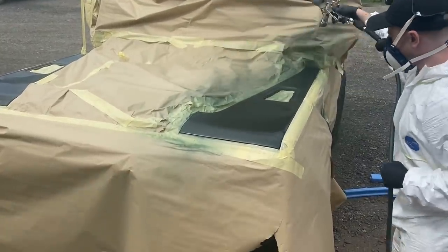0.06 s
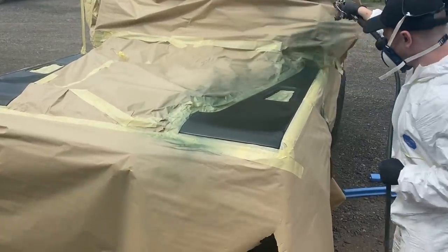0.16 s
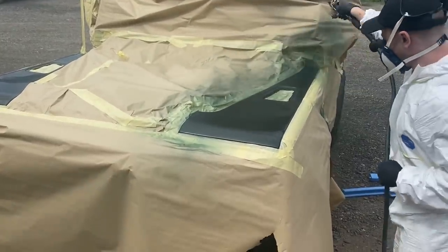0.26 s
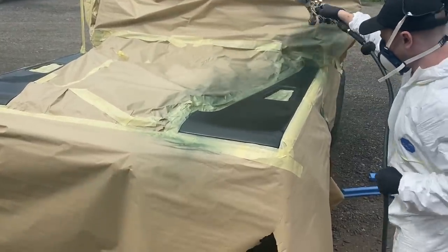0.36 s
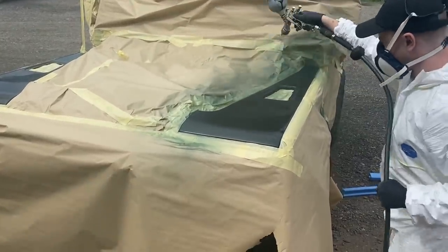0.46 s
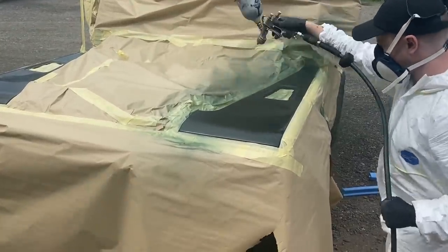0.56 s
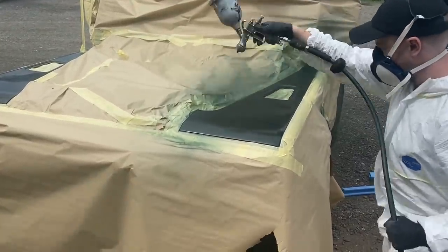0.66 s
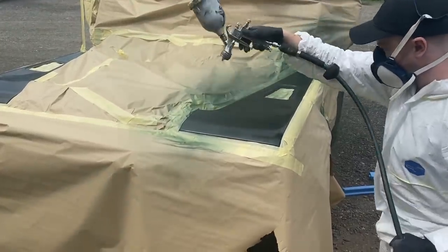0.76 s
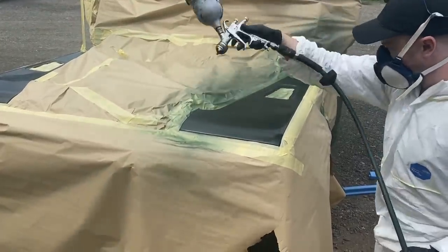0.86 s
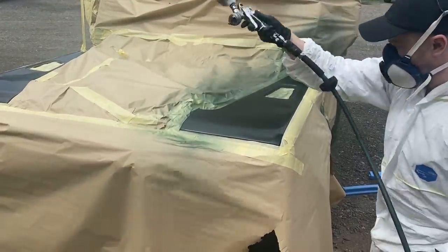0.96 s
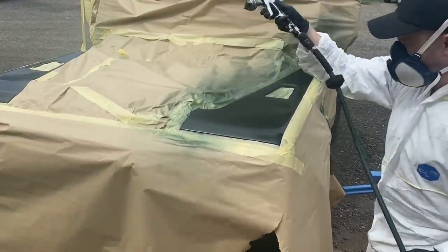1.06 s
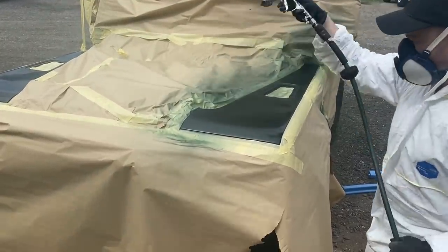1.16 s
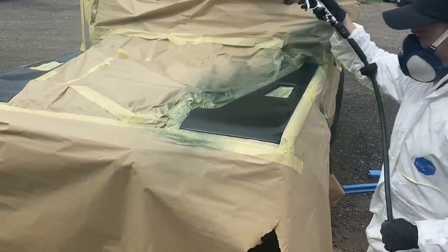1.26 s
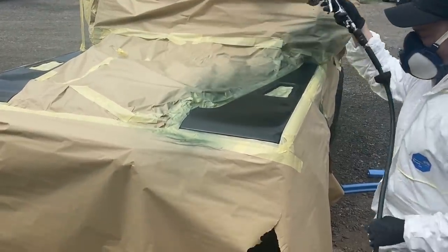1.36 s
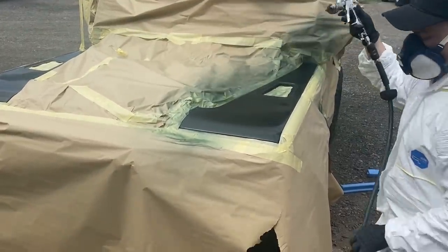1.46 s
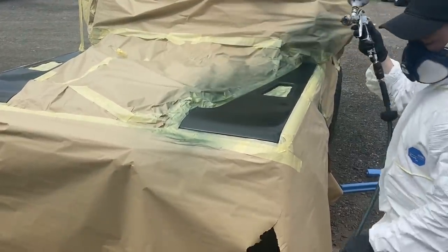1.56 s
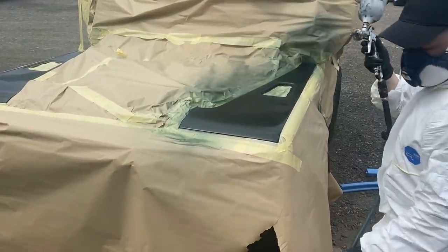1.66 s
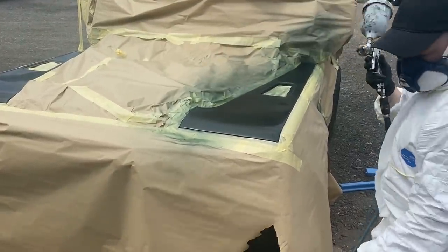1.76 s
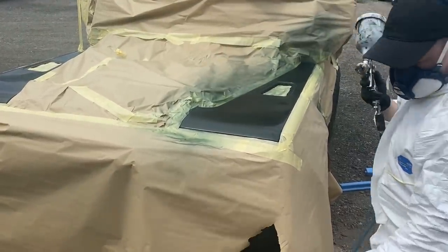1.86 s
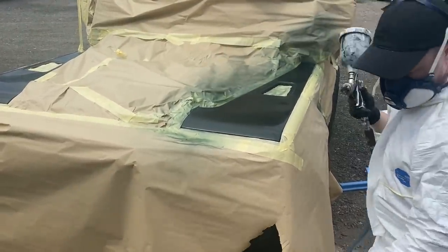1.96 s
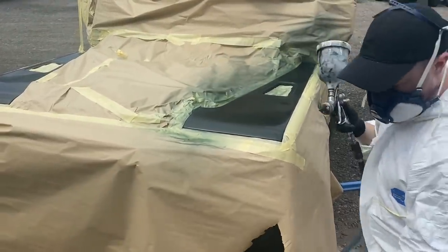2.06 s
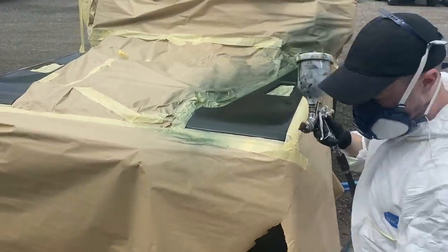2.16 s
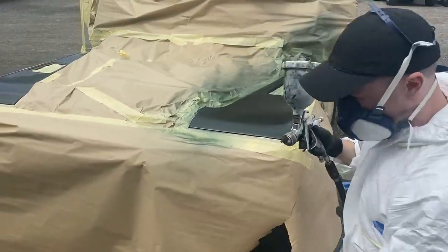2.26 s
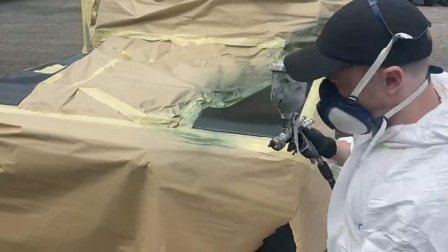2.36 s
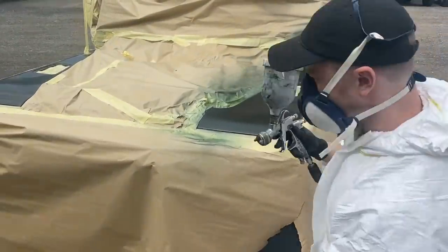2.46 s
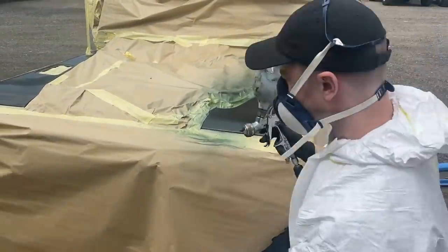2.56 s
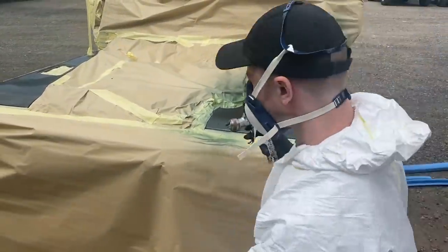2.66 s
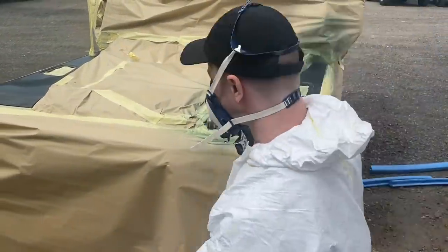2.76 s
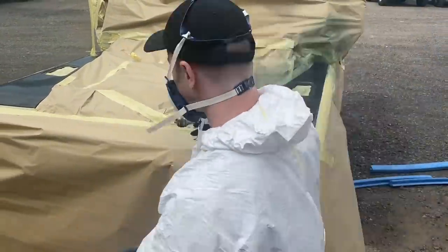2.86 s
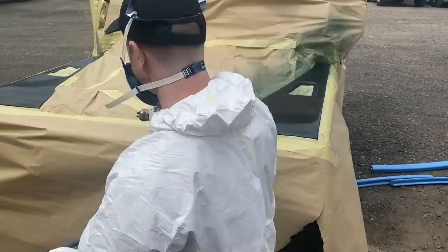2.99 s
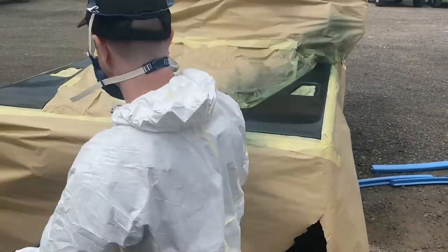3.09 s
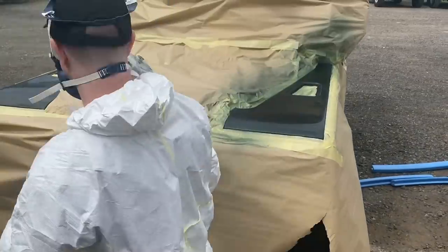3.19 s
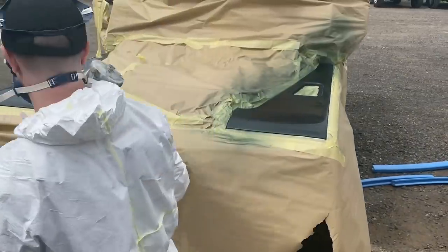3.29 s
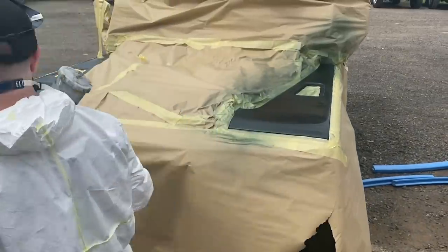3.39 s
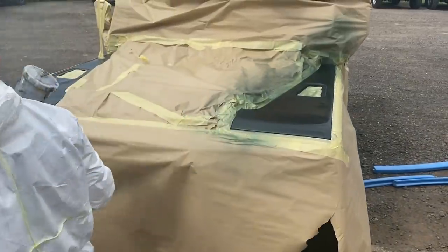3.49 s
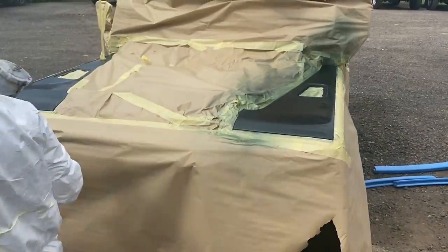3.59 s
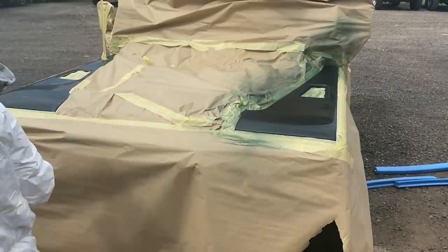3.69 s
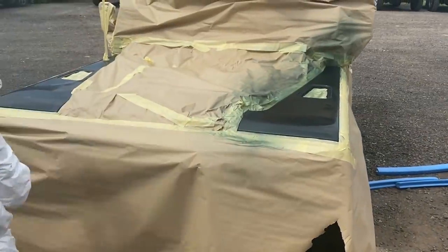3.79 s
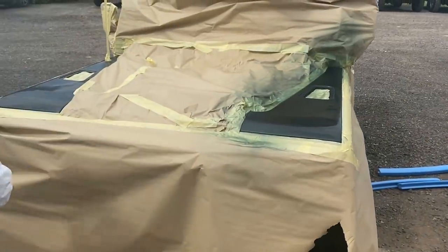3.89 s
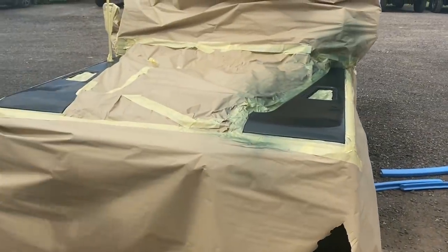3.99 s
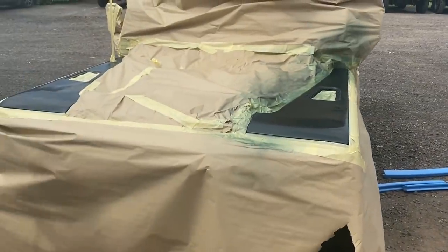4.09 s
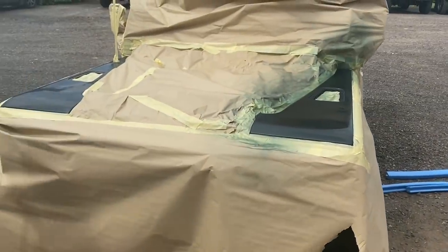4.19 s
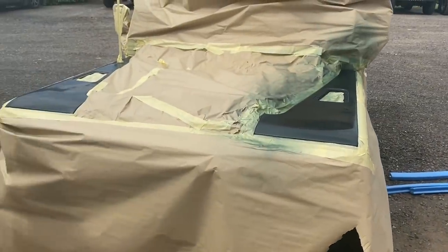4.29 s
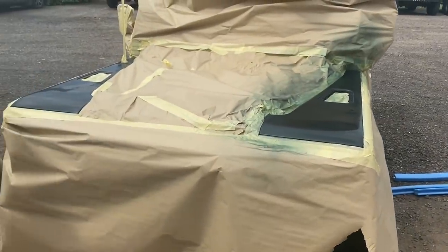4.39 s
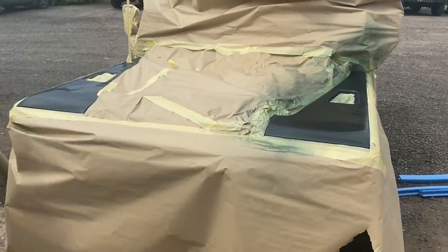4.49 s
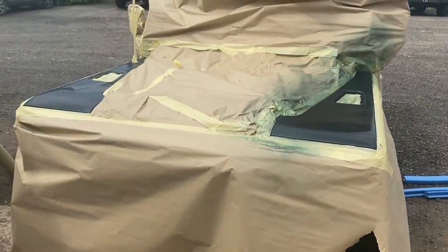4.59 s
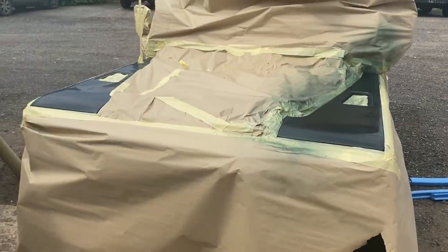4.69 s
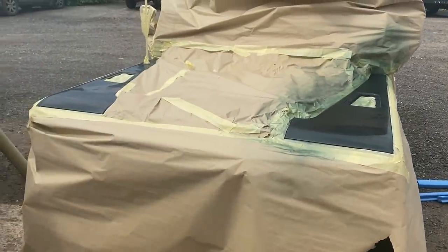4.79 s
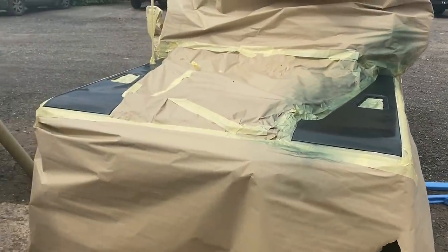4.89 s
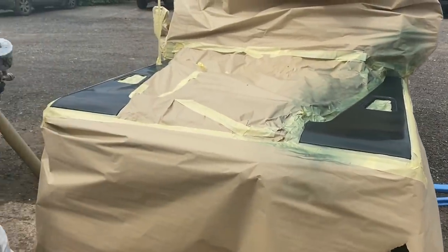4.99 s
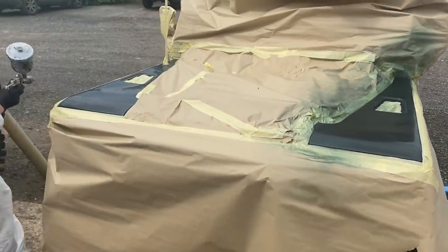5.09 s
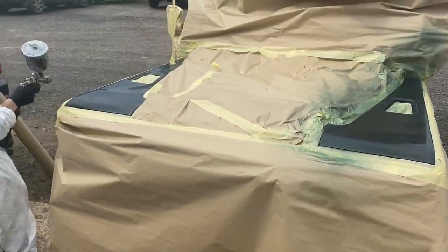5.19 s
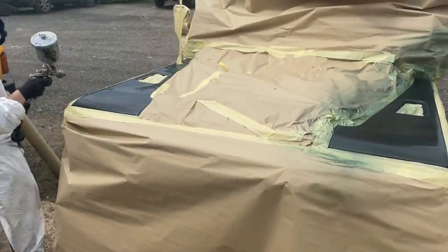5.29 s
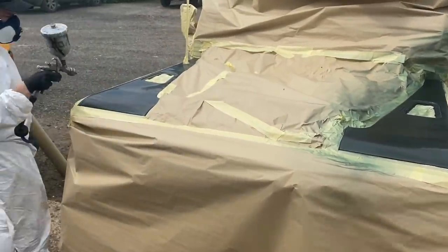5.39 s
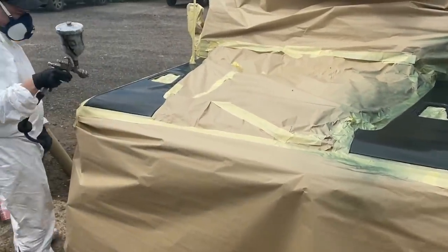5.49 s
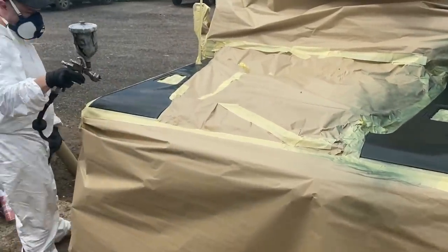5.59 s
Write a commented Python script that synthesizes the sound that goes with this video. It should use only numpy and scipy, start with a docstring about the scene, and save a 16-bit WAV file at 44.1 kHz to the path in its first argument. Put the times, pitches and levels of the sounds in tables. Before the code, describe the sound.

A spray gun hisses hard, drops to a faint air leak, then hisses again, with wind bumping the microphone outdoors.

```python
"""Outdoors, beside a paper-masked car, a painter works a spray gun. Its turbulent air jet hisses at full
strength, drops to a faint leak while the painter walks round, and opens again near the end. Echoes from
the panel, paper and ground colour the hiss. Air buffets the hand-held microphone, shoes and cloth scuff,
small things tick, and a distant motor hums over the low rush of the yard."""
import sys
import numpy as np
from scipy import signal
from scipy.fft import rfft, irfft, next_fast_len
from scipy.io import wavfile
from scipy.ndimage import uniform_filter1d, map_coordinates

SR = 44100
rng = np.random.default_rng(int(sys.argv[2]) if len(sys.argv) > 2 else 0)


def materialize(psi):
    """Save the field psi as 16-bit PCM at rate SR to the path in sys.argv[1].

    A 1-D psi becomes a single channel; in a 2-D psi each row is a channel.
    """
    bounded = np.clip(np.atleast_2d(psi).T, -1, 1)
    quanta = np.round(bounded * 32767).astype(np.int16)
    wavfile.write(sys.argv[1], SR, quanta)


N = 249165

# The distant motor. Each row: time in seconds, level in dB.
MOTOR_LEVEL = [(3.1, -100), (3.4, -73), (4.04, -73.5), (4.41, -83.5), (4.55, -69.5), (4.89, -79.5),
               (4.98, -62), (5.12, -82.5), (5.25, -74.5), (5.4, -100)]
# Shoes and cloth. Each row: middle in seconds, level in dB, length in seconds, band pitch in Hz.
SCUFFS = [(0.323, -50, 0.0665, 500.3), (1.25, -54.5, 0.06585, 1792), (1.351, -63.5, 0.0466, 1210),
          (1.535, -60, 0.0689, 1495), (2.205, -60, 0.076, 797), (3.396, -65, 0.082, 1502),
          (3.856, -61.5, 0.0394, 994.5), (4.314, -60.5, 0.0353, 902.4), (4.487, -57, 0.05038, 2610),
          (4.64, -64, 0.0448, 899), (5.075, -63.5, 0.03195, 1500)]
# Small knocks. Each row: start in seconds, ring level in dB, pitch in Hz, seconds to fall 60 dB,
# click level in dB relative to the ring.
KNOCKS = [(1.063, -34, 360.3, 0.01083, 2.5), (1.408, -49, 486, 0.01262, 6),
          (2.165, -48.5, 751.8, 0.01258, 11.5), (4.659, -51.5, 546, 0.01315, 5),
          (4.708, -43.5, 527.3, 0.0126, 4.5), (4.744, -58.5, 301, 0.01341, 11),
          (5.075, -52, 421.3, 0.01647, 5)]
# Air between gusts. Each row: time in seconds, thump level in dB, flutter level in dB.
BREEZE = [(0, -69.5, -62), (.9, -64.5, -62), (1.4, -78, -80), (2.3, -77, -71), (2.6, -83.5, -73),
          (3.2, -83.5, -72), (3.6, -83.5, -71.5), (4.25, -83.5, -67), (4.45, -76, -75.5), (5.2, -75.5, -71),
          (5.65, -75.5, -64.5)]
# Gusts. Each row: peak time in seconds, thump in dB, flutter in dB, seconds to fall 20 dB (sign unused).
GUSTS = [(.032, -62.5, -64, 0.0861), (.31, -69, -53.5, 0.0362), (.42, -59.5, -75.5, 0.1238),
         (.49, -46.5, -70, -0.0287), (.535, -38, -53.5, 0.024), (.578, -39, -59.5, 0.0508),
         (.67, -56, -61.5, 0.4412), (0.753, -33, -75, 0.0365), (.825, -51.5, -70, 0.318),
         (.965, -47, -37, 0.0631), (1.004, -34, -31, 0.0634), (1.025, -32, -41.5, 0.0563),
         (1.068, -40.5, -40.5, 0.0686), (1.19, -48.5, -55, 0.0978), (1.27, -44, -62.5, 0.0753),
         (1.315, -47.5, -67.5, 0.0644), (1.424, -48, -69, 0.1007), (1.562, -54, -65, 0.0007),
         (1.66, -63.5, -86, 0.3052), (1.845, -56.5, -78, 0.1655), (2.064, -51.5, -79.5, 0.0142),
         (2.165, -48, -68, 0.0688), (2.31, -49.5, -62, 0.0454), (2.37, -51, -71, 0.1046),
         (2.45, -68.5, -69.5, 0.2611), (2.53, -68, -70.5, -0.142), (2.66, -56.5, -65, 0.0214),
         (2.785, -57.5, -62.5, 0.0729), (2.91, -66.5, -71, 0.58), (3.02, -65, -84.5, 0.31),
         (3.12, -60.5, -77, 0.0434), (3.26, -64.5, -74, 0.0011), (3.385, -58, -67.5, 0.1342),
         (3.49, -62, -68, 0.013), (4.318, -53, -59, 0.0242), (4.352, -50.5, -70, 0.0482),
         (4.5, -70.5, -60.5, 0.1992), (4.59, -55.5, -70, 0.0467), (4.63, -48, -77, 0.0366),
         (4.661, -65.5, -65.5, -0.0391), (4.71, -60.5, -56, 0.0238), (4.755, -59.5, -72, 0.11),
         (4.95, -73, -67, 0.2532), (5.075, -72.5, -63.5, 0.1233), (5.63, -60.5, -66, 0.2535)]
# Spectra of wind and jet. Each row: frequency in Hz, relative spectral density in dB.
THUMP_SPECTRUM = [(20, -24), (35, -13), (55, 3.5), (90, -1.5), (140, -12.5), (220, -27), (400, -70.5)]
FLUTTER_SPECTRUM = [(100, -6.5), (190, -2), (330, -5.5), (600, -9.5), (1000, -14), (2000, -64.5)]
JET_SPECTRUM = [(50, -58), (150, -15.5), (400, -23), (800, -9.5), (1050, -12.5), (1350, -6.5), (1700, -9.5),
                (2300, -7.5), (3300, -7), (4300, -6), (6400, -2.5), (8400, 5), (9500, 0.5), (11000, 3.5),
                (13100, 3.5), (14600, 5), (15700, 0)]
# The gun's direction. Each row: time in seconds, left lag in microseconds, weight of direct sound
# (0 to 1) below and above about 2 kHz.
GUN_BEARING = [(0, 48, 0.697, 0.8177), (.3, 24.5, 0.3052, 0.9164), (.7, -10.5, 0.8641, 0.7978),
               (1.1, -8, 0.5146, 0.8255), (1.3, 42.5, 0.2764, 0.9095), (1.6, 92.5, 0.2155, 0.9929),
               (2.2, 69, 0.4436, 0.849), (2.8, -29, 0.704, 0.524), (3.3, -70, 0.5895, 0.676),
               (4.1, -250, 0.491, 0.1207), (4.55, -270, 0.776, 0.1328), (5, -240, 0.729, 0.3694),
               (5.35, -180, 0.9686, 0.814), (5.65, -115, 0.587, 0.599)]
# Diffraction round the microphone casing. Each row: frequency in Hz, left phase lag in radians.
CASING_PHASE = [(2600, -0.9185), (3500, 0.0537), (5300, -0.8311), (6200, -0.5), (7600, 2.2297)]
# The band that favours the left port. Each row: left lag in microseconds, band centre in Hz.
LEFT_BAND = [(-260, 3895), (-170, 4270), (-4.5, 4383), (40, 5678)]
# The panel echo's notch. Each row: time in seconds, centre in Hz, depth in dB (negative for a peak),
# left phase lag in radians.
PANEL_NOTCH = [(0, 4250, 3.5, -0.9), (.15, 3789, 5.5, -0.416), (.55, 3803, 4.5, -0.9952),
               (.75, 3204, 4.5, -3.5), (.95, 3243, -1.5, -3), (1.1, 4154, -4, -0.18),
               (1.3, 4148, 4.5, -0.8535), (2.15, 4259, 6.5, -0.6308), (2.5, 4126, 2, -1.5),
               (2.9, 2908, -2, -2.5), (3.3, 4034, -1, -1.2066), (4.8, 3781, -0.5, 0.5),
               (5.4, 4273, 4, -1.5), (5.45, 2706, 10, -1.25), (5.65, 2770, 5, -1.2365)]
# The turning jet. Each row: time in seconds, gains in dB at 5.7-8.3 kHz, at 2.8-5.7 kHz and below.
JET_COLOUR = [(0, 1.5, -3, -2.5), (.15, -5, -2, -5), (.3, -5, 2, -3), (.6, 6, -1.5, 1), (.9, 1, 0.5, -4.5),
              (1.05, -5, -9, -7), (1.13, 2.5, -7, -6.5), (1.26, -9, -4, -8.5), (1.6, -6.5, -3.5, -21.5),
              (2, -6.5, -4, -12), (2.3, -1.5, -.5, -6.5), (2.4, -10.5, -2.5, -4), (2.6, -2, 2.5, 0.5),
              (3.7, 3, 0, -2.5), (4.5, 0.5, 3.5, 2.5), (4.85, 8.5, -0.5, -3), (5.1, 4.5, -1.5, 2),
              (5.4, 3.5, 0, 1.5), (5.45, 3.5, -4, -6), (5.65, 3, -3.5, -5)]
# The leak as the nozzle moves. Each row: time in seconds, gain in dB.
LEAK_GAIN = [(0, -48), (.116, -45), (.238, -49), (.55, -48.5), (.7, -44.5), (.96, -40.5), (1.05, -42),
             (1.12, -47.5), (1.2, -46), (1.24, -42.5), (1.36, -44.5), (1.53, -38.5), (1.63, -42.5),
             (1.86, -39.5), (2.07, -39), (2.28, -42), (2.41, -40), (2.65, -46.5), (3.09, -52), (3.4, -49),
             (3.6, -49.5), (4.3, -49.5), (5.05, -47), (5.15, -48), (5.41, -45.5), (5.65, -45)]
# Trigger release, then pull. Each row: start in seconds, gain change in dB, travel time in seconds.
TRIGGER_STROKES = [(1.128, -20, 0.04405), (5.416, 24, 0.03274)]


def amp(db):
    return 10 ** (np.asarray(db) / 20)


def unit_rms(x):
    return x / np.sqrt(np.mean(x ** 2) + 1e-20)


def over_frequency(points, hz):
    """Interpolate (Hz, value) points on a logarithmic axis."""
    knots, values = np.transpose(points)
    return np.interp(np.log(hz + 1), np.log(knots + 1), values)


def curves(rows, at):
    """Interpolate each later column against the first."""
    knots, *columns = np.transpose(rows)
    return [np.interp(at, knots, column) for column in columns]


def wobble(rate):
    """A smooth random curve with rate knots a second."""
    return map_coordinates(rng.standard_normal(int(N * rate / SR) + 4), [np.arange(N) * rate / SR])


def filtered(x, response):
    """Multiply the spectrum of x by a complex frequency response."""
    size = next_fast_len(N + SR // 4)
    return irfft(rfft(x, size) * response(np.fft.rfftfreq(size, 1 / SR)), size)[..., :N]


def below(hz, edge_hz, order):
    return 1 / (1 + (hz / edge_hz) ** order)


def bell(hz, centre_hz, log_width):
    return np.exp(-(np.log(hz / centre_hz) / log_width) ** 2)


def stereo_noise(spectrum, side_db):
    """Partly coherent noise: one part in phase at the two microphone ports, one in antiphase."""
    mid, side = filtered(rng.standard_normal((2, N)), lambda hz: amp(over_frequency(spectrum, hz)))
    return unit_rms(np.array([mid + amp(side_db) * side, mid - amp(side_db) * side]))


def motor_hum(pitch_hz=216.46):
    """Periodic vibration of a distant motor radiates a tone, modulated in level and frequency."""
    db, = curves(MOTOR_LEVEL, np.arange(N) / SR)
    gain = amp(db + 2.54 * wobble(20))
    hz = pitch_hz + 8 * wobble(8) + 5 * wobble(25)
    return gain * np.sin(2 * np.pi * np.cumsum(hz) / SR)


def scuffs():
    """Friction of shoes and cloth makes brief swells of gritty, band-limited noise."""
    out, t = np.zeros((2, N)), np.arange(N) / SR
    grit = rng.standard_normal(N) * amp(3 * wobble(500)) + .4 * rng.standard_normal((2, N))
    for middle, db, length, hz in SCUFFS:
        span = slice(round((middle - .15) * SR), round((middle + .15) * SR))
        band = signal.butter(1, [hz / 2.5, hz * 1.8], "bandpass", fs=SR)
        swell = np.exp(-(2.598 * (t[span] - middle) / length) ** 2)
        out[:, span] += amp(db) * unit_rms(signal.lfilter(*band, grit[:, span])) * swell
    return out


def ticks(click_hz=1150, click_t60=0.00284):
    """An impact gives a click and excites one mode, which decays exponentially."""
    out, t = np.zeros(N + SR), np.arange(SR // 16) / SR
    for start, db, hz, t60, click_db in KNOCKS:
        click = amp(click_db - 60 * t / click_t60) * np.sin(2 * np.pi * click_hz * t)
        ring = amp(-60 * t / t60) * np.sin(2 * np.pi * hz * t)
        out[round(start * SR):][:len(t)] += amp(db) * (ring + click)
    return out[:N]


def wind_gains(rise_over_fall=0.5044, steepness=1.333):
    """Breeze and gusts add as incoherent powers, giving the envelopes of thump and flutter."""
    t = np.arange(N) / SR
    power = amp(np.array(curves(BREEZE, t)) + [[6], [1]] * wobble(14)) ** 2
    for peak, thump_db, flutter_db, fall in GUSTS:
        span = slice(max(round((peak - .5) * SR), 0), round((peak + .5) * SR))
        from_peak = np.maximum(t[span] - peak, (peak - t[span]) / rise_over_fall) / abs(fall)
        drop_db = 20 * np.clip(from_peak, 0, 4) ** steepness
        power[:, span] += amp(np.array([[thump_db], [flutter_db]]) - drop_db) ** 2
    return np.sqrt(power)


def wind_buffet():
    """Pressure fluctuations in moving air drive the diaphragm in low thumps and a higher flutter."""
    thump_gain, flutter_gain = wind_gains()
    pressure = stereo_noise(THUMP_SPECTRUM, side_db=-9.5)
    # dividing by the envelope evens out the swing within a thump
    swing = np.sqrt(np.abs(uniform_filter1d(np.sum(pressure ** 2, axis=0), size=1100)))
    thump = thump_gain * unit_rms(pressure / (swing + 0.1205))
    eddies = stereo_noise(FLUTTER_SPECTRUM, side_db=-10)
    flutter = flutter_gain * unit_rms(amp(2.955 * wobble(40)) * eddies)
    # group delay grows towards the bass, so each thump slides down in pitch
    slide = lambda hz: np.exp(-2j * np.pi * 0.89976 * (np.log(hz + 20) - hz / 69.695))
    return filtered(thump, slide) + flutter


def nozzle_db(t, held_db=20):
    """Airflow sets the gain of the hiss: that of the leak, raised while the trigger is held."""
    strokes = sum(db * np.sin(np.pi / 2 * np.clip((t - start) / travel, 0, 1)) ** 2
                  for start, db, travel in TRIGGER_STROKES)
    return curves(LEAK_GAIN, t)[0] + held_db + strokes


def jet_colour_db(hz, t, yard_db=-46.5):
    """Directivity: three bands change level as the jet turns. The lowest also holds the yard's rush."""
    upper_db, middle_db, low_db = curves(JET_COLOUR, t)
    # taking off the nozzle's gain keeps the yard independent of the trigger
    rush_db = 10 * np.log10(amp(low_db) ** 2 + amp(yard_db - nozzle_db(t)) ** 2)
    low, middle, upper = below(hz, 2801.6, order=8), below(hz, 5705.8, order=8), below(hz, 8309.4, order=10)
    turning_db = (upper - middle) * upper_db + (middle - low) * middle_db
    return over_frequency(JET_SPECTRUM, hz) + turning_db + low * rush_db


def reflections(hz, t):
    """Interference: the panel echo cuts two moving notches; paper and ground add drifting ripple."""
    notch_hz, depth_db, twist = curves(PANEL_NOTCH, t)
    notch = bell(hz, notch_hz, log_width=.06)
    next_notch = 0.4563 * bell(hz, 1.7094 * notch_hz, log_width=0.07145)
    ripple = uniform_filter1d(rng.standard_normal((len(hz), len(t))), size=4, axis=0)
    ripple = unit_rms(uniform_filter1d(ripple, size=24, axis=1))
    ripple_db = (1.9678 + 0.282 * below(hz, 8309.4, order=10)) * ripple
    echo_phase = twist * notch ** 0.1259
    return ripple_db - depth_db * (notch + next_notch), echo_phase


def port_responses(hz, t, echo_phase, left_band_db=4):
    """Path difference delays long waves between the two ports; short waves diffract round the casing."""
    lag_us, _, _ = curves(GUN_BEARING, t)
    long_waves = below(hz, 2659.7, order=12)
    path_phase = 2 * np.pi * hz * lag_us * 1e-6
    phase = long_waves * path_phase + (1 - long_waves) * over_frequency(CASING_PHASE, hz) + echo_phase
    band_hz, = curves(LEFT_BAND, lag_us)
    balance_db = left_band_db * bell(hz, band_hz, log_width=0.2549) - 0.003463 * lag_us * long_waves
    left = amp(balance_db / 2) * np.exp(-.5j * phase)
    return [left, 1 / left]


def direct_share(hz, t):
    """Coherence: the fraction of power common to both ports; the rest arrives scattered."""
    _, direct_low, direct_high = curves(GUN_BEARING, t)
    low = below(hz, 1819, order=10)
    treble_shelf = 0.4979 + 0.5573 * below(hz, 5316.6, order=20)
    share = low * direct_low + (1 - low) * direct_high * treble_shelf + 0.0433 * below(hz, 330, order=2)
    return np.clip(share, 0, 1)


def spray_gun():
    """Turbulent mixing of the jet radiates broadband noise, whose colour and bearing follow the gun."""
    bins, t, noise = signal.stft(rng.standard_normal((3, N)), SR, nperseg=512)
    hz = bins[:, None] + 1
    echo_db, echo_phase = reflections(hz, t)
    share = direct_share(hz, t)
    field = np.sqrt(share) * noise[0] + np.sqrt(1 - share) * noise[1:]
    spectra = field * port_responses(hz, t, echo_phase) * amp(jet_colour_db(hz, t) + echo_db)
    hiss = signal.istft(spectra, SR, nperseg=512)[1][:, :N]
    flicker_db = 0.3622 * wobble(9) + 0.4492 * wobble(60)
    return amp(nozzle_db(np.arange(N) / SR) + flicker_db) * hiss


def scene():
    """Superposition: the pressures of the sources add."""
    return spray_gun() + wind_buffet() + ticks() + scuffs() + motor_hum()


def record(dry, mono_above_hz=8000, left_lag_s=1 / 5380, limit_hz=15750):
    """Band-limited pickup: one channel's treble feeds both sides and reaches the left slightly later."""
    treble = lambda hz: 1 / (1 + (mono_above_hz / (hz + 1)) ** 40)
    delay = lambda hz: np.exp(-1j * np.pi * hz * left_lag_s * np.array([[1], [-1]]))
    stereo_body = filtered(dry, lambda hz: 1 - treble(hz))
    shared_treble = filtered(dry[0], lambda hz: treble(hz) * delay(hz))
    return filtered(stereo_body + shared_treble, lambda hz: hz < limit_hz)


dry = scene()
out = record(dry)
materialize(out)
```